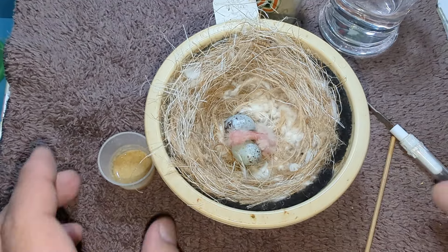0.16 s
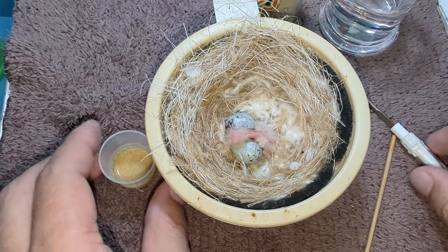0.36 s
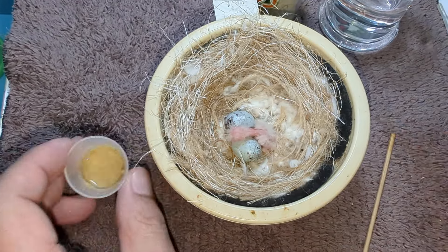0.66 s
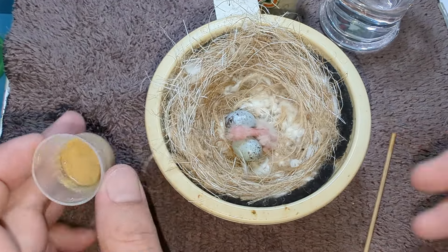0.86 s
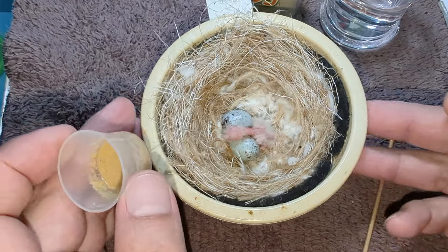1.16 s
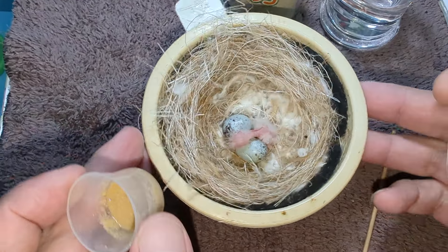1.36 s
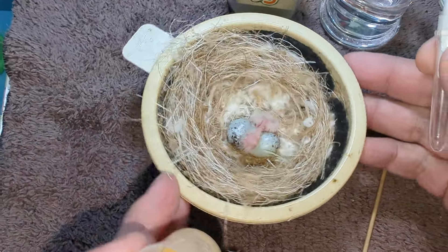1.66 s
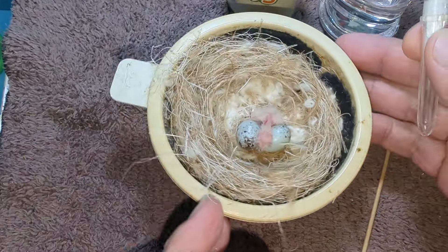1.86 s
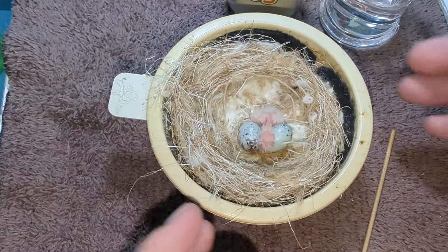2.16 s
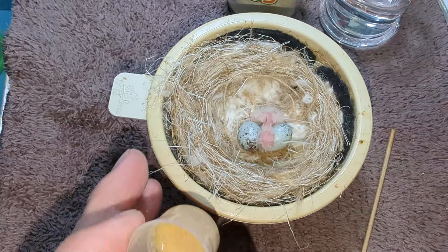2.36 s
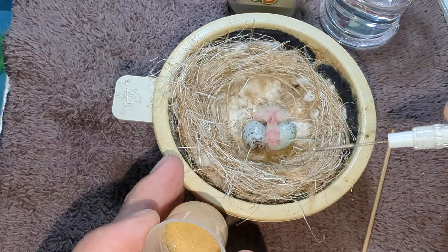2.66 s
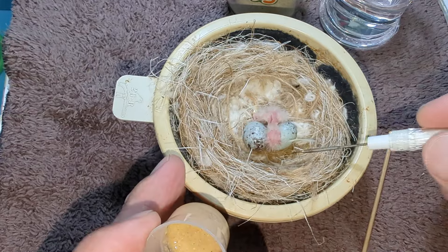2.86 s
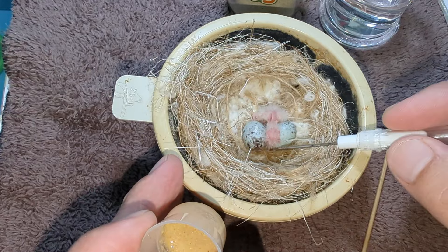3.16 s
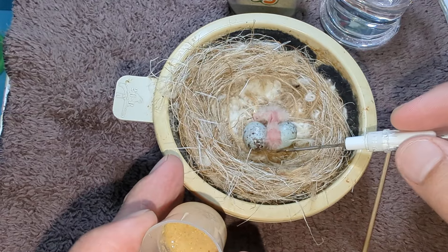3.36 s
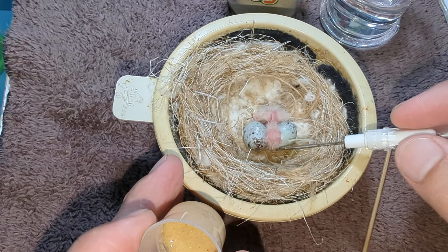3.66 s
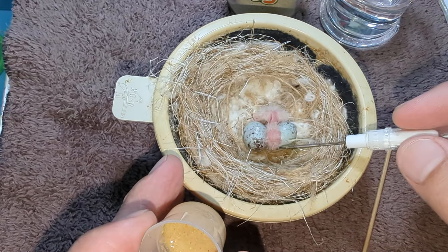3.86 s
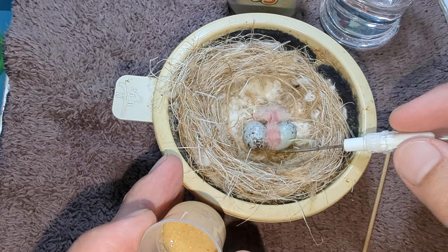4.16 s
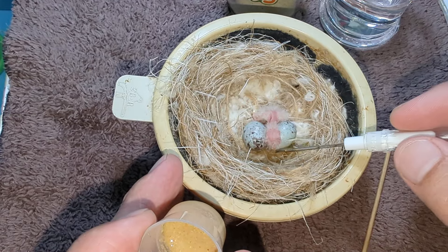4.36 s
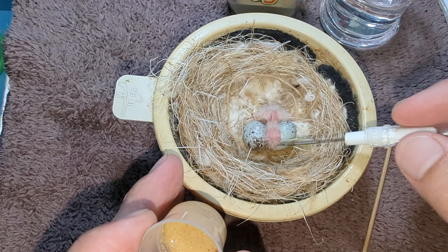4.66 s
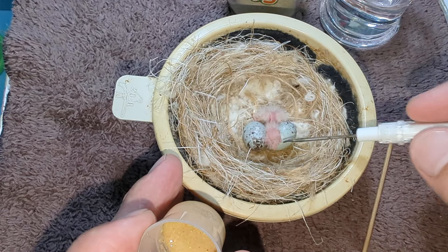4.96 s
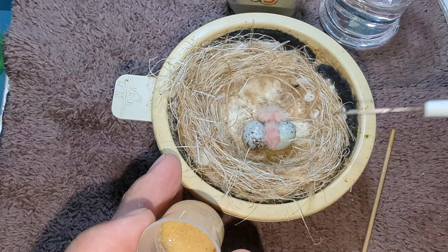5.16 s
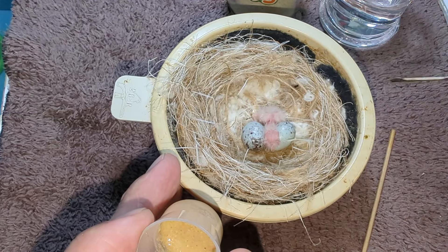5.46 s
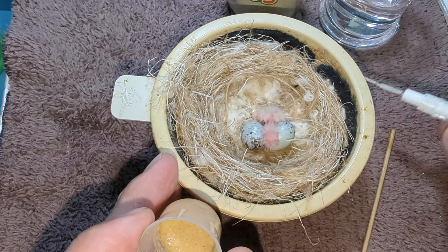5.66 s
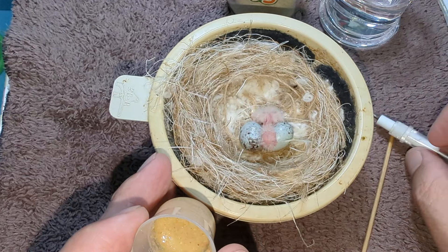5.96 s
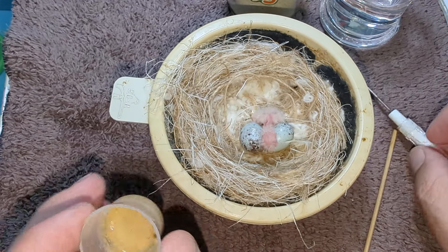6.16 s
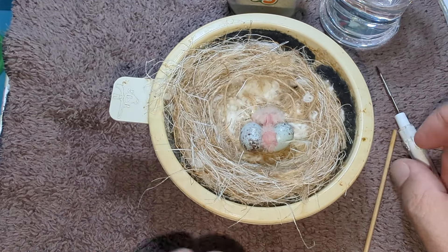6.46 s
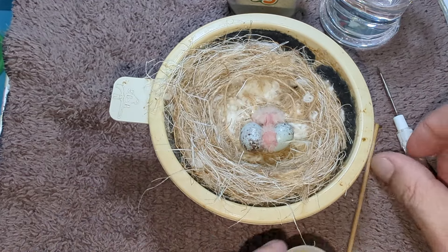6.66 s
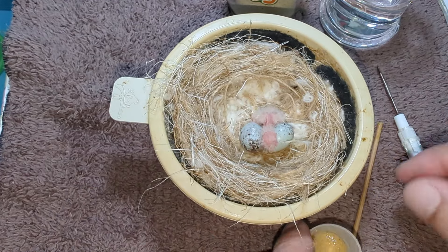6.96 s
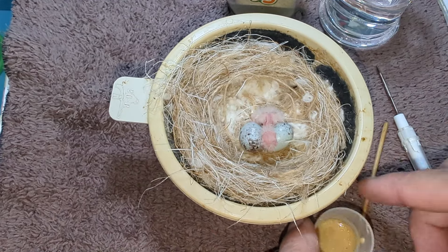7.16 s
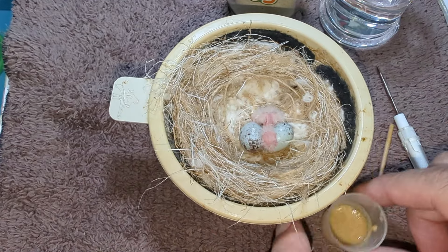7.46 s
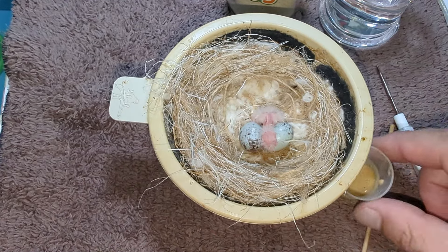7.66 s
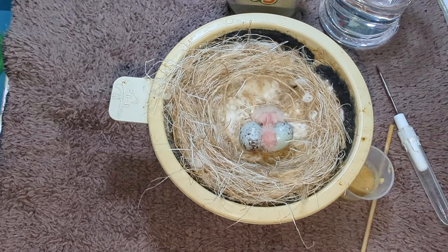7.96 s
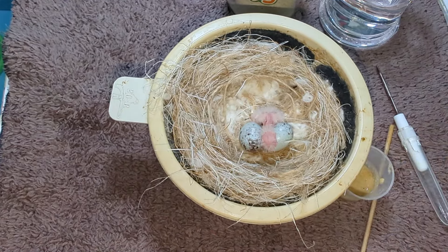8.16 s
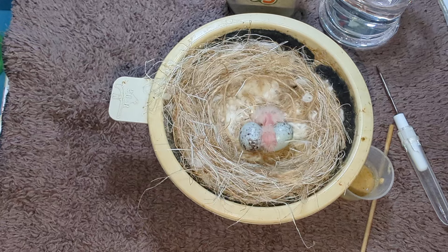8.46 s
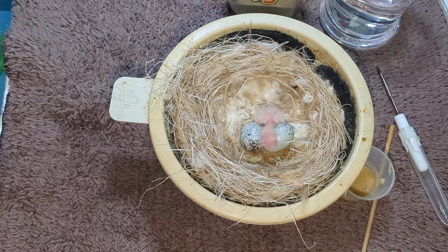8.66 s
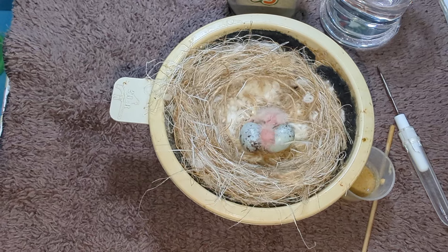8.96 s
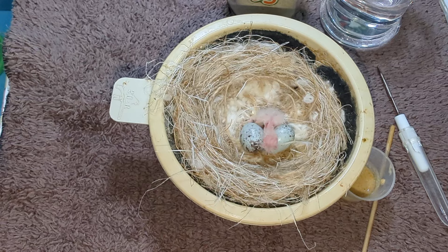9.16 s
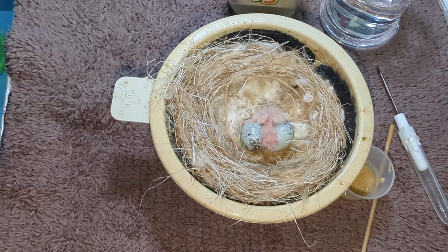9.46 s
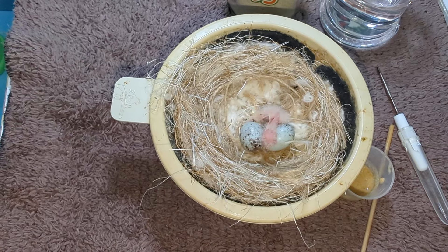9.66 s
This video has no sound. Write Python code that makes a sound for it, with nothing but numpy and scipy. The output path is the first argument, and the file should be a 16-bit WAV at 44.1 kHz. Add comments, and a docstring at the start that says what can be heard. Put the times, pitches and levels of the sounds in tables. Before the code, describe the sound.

In a small quiet room with low hum and steady air noise, a newly hatched chick gives thin, high, arching peeps amid dry rustling. The nest bowl knocks once, then someone makes a quick run of loud, wet lip kisses with a squeaky suck of air. The chick answers with a rapid string of peeps, then slows to isolated ones while other birds whistle faintly. Close stereo microphone.

```python
"""A low room hum and steady air noise run throughout, with a dry treble rustle, soft rubs and long dull swells of noise.
From 0.3 s a canary chick peeps thinly in its straw nest: near sines that arch up in pitch and droop.
The nest bowl gives one dry knock at 1.4 s. From 2.9 to 4.3 s someone coaxes the chick with a quick run of
lip kisses, built from filtered pulses with wet spray, over an unsteady squeak of sucked air.
From 4.5 s other birds whistle faintly further off, as gliding sines heard mostly by way of the small room."""
import sys
import numpy as np
from scipy import signal
from scipy.fft import rfft, irfft
from scipy.io import wavfile

SR = 44100
rng = np.random.default_rng(int(sys.argv[2]) if len(sys.argv) > 2 else 0)


def master(y):
    """Save y as 16-bit WAV."""
    cut = np.clip(np.atleast_2d(y).T, -1, 1)
    pcm = np.round(cut * 32767)  # scale
    wavfile.write(sys.argv[1], SR, pcm.astype(np.int16))


N = 432621
TIME = np.arange(N) / SR  # s

# Decay of the small room. Each row: frequency in Hz, time to fall by 60 dB in seconds.
ROOM_DECAY = [(150, 0.28), (700, 0.26), (2800, 0.23), (5500, 0.28), (9000, 0.25), (15000, 0.15)]
# Spectrum of the air noise. Each row: frequency in Hz, relative density in dB per Hz.
AIR_SPECTRUM = [(22, -49), (38, 5), (107, -3), (207, -13.5), (389, -14.5), (488, -14.5), (613, -11.5),
                (662, -13), (1040, -13.5), (2730, -18), (5670, -29), (8720, -27.5), (10200, -42),
                (14500, -44), (16000, -59)]
# How alike the air noise is at the two ports. Each row: frequency in Hz, left-right likeness from 0 to 1.
AIR_LIKENESS = [(30, .97), (60, .92), (130, .9), (290, .82), (640, .15), (1400, .1), (16000, .2)]
# Lines of the appliance hum. Each row: frequency in Hz, rms level in dB.
HUM_LINES = [(70, -61), (106, -64.5), (119, -64), (175, -70), (241, -71.5), (619, -73.5), (738, -75.5)]
# Soft rubs and long dull swells of noise.
# Each row: start in seconds, length in seconds, centre frequency in Hz, level in dB.
RUBS_AND_SWELLS = [(0, 2.52, 257, -66.5), (0.49, .11, 1310, -56.5), (1.827, 0.11, 2330, -58.5),
                   (2.935, .085, 360, -51), (2.97, .11, 177, -52), (4.001, 2.36, 60.6, -59),
                   (4.001, 2.56, 245, -65), (5.982, 0.0523, 1600, -52), (6.325, .27, 2596, -58.5),
                   (6.416, 0.053, 490, -55.5), (8.202, 1.95, 950, -65.5)]
# How strong the dry treble rustle is. Each row: time in seconds, relative level in dB.
RUSTLE_LEVEL = [(0, -76.5), (.6, -69), (1.3, -73), (1.9, -68), (2.55, -75), (3.1, -63.5), (4, -71),
                (4.65, -67.5), (5.95, -67.5), (6.25, -72), (7.1, -88.5), (7.5, -68.5), (8.1, -77.5),
                (8.3, -69), (8.5, -81), (9.8, -83)]
# Colour of the dry rustle. Each row: frequency in Hz, relative gain in dB.
RUSTLE_COLOUR = [(1500, -2), (3000, -6.5), (6000, 0.5), (8800, 6), (10000, -5), (13000, 1), (16000, -14)]
# Single straw stalks crackling. Each row: start in seconds, level in dB.
CRACKLES = [(1.409, -51), (2.728, -49.5), (5.407, -54), (5.574, -42), (5.59, -64), (5.621, -53),
            (5.714, -52), (9.471, -55)]
# The chick's peeps. Each row: time of the arch's top in seconds, top pitch in Hz, level ahead of the throat in dB.
PEEPS = [(.291, 5050, -55.5), (1.038, 5390, -54), (1.228, 5390, -53.5), (1.582, 5410, -54.5),
         (1.657, 6900, -59.5), (1.709, 5550, -54), (1.838, 5300, -55.5), (1.898, 7010, -55.5),
         (1.953, 5340, -55.5), (2.094, 5300, -57.5), (2.248, 5160, -55.5), (2.634, 6490, -58.5),
         (3.384, 5400, -50), (3.577, 5100, -48), (4.14, 5390, -52), (4.364, 5850, -49),
         (4.653, 5530, -49.5), (4.809, 5450, -51), (4.936, 5400, -50), (5.057, 5146, -50.5),
         (5.172, 5050, -49.5), (5.308, 5100, -50.5), (5.422, 4940, -50.5), (5.54, 5130, -51),
         (5.674, 5310, -52.5), (5.814, 5060, -51.5), (5.819, 6550, -46.5), (5.952, 5030, -51),
         (5.958, 6920, -43), (6.67, 5080, -49), (7.527, 4584, -51), (8.263, 4760, -52.5),
         (9.139, 5060, -53.5), (9.257, 4990, -53.5), (9.559, 5300, -50.5)]
# Resonance of the chick's throat. Each row: frequency in Hz, gain in dB.
THROAT = [(3400, 7), (4100, 1), (4450, 4), (5600, -2), (7000, 2), (9300, 5), (11500, -1)]
# The nest bowl when knocked. Each row: frequency in Hz, relative gain in dB.
BOWL_COLOUR = [(120, -39), (200, -17), (2540, -1), (3890, -26), (6400, -12), (10200, -33), (14000, -39)]
# The lip kisses. Each row: time of the pop in seconds, ring pitch in Hz, body level in dB, hollow bass lift in dB,
# ring level in dB, spray level in dB, lead of the first slip in seconds,
# ring and spray offset of the slips in dB, on top of their growth towards the pop.
KISSES = [(2.8858, 2630, -31.5, -10, -53, -27, 0.01, 3.5), (3.08, 2960, -24.5, 6, -26.5, -27.5, 0.022, 0),
          (3.284, 2770, -27, -4, -21, -33, .015, -0.5), (3.485, 2670, -28.5, 9, -19.5, -30, .021, -5.5),
          (3.68, 2980, -30.5, -3, -32.5, -37.5, 0.00033, -8),
          (3.884, 2620, -26, -0.5, -22.5, -25.5, .027, -10.5),
          (4.1078, 3170, -32.5, 0.5, -24, -34.5, 0, -1.5), (4.32, 2930, -20.5, 0, -20, -20.5, 0.031, -15)]
# Body of a lip snap. Each row: frequency in Hz, relative gain in dB.
SNAP_BODY = [(90, -37), (170, -21), (240, 6.5), (400, -4), (660, -4.5), (900, 6), (1600, 1.5), (2200, 2.5),
             (2900, 5), (4500, -24.5)]
# Wet spray of a lip snap. Each row: frequency in Hz, relative gain in dB.
SNAP_SPRAY = [(1500, -60), (3000, -6.5), (4200, 0), (5200, -12), (6500, -4), (7600, -7), (8900, 1),
              (10000, -5.5), (10900, 7.5), (12000, 0.5), (16000, -20)]
# The left port against the right, for the kisses. Each row: frequency in Hz, gain in dB.
LEFT_SHADE = [(1000, -2.5), (2800, 2), (7500, -0.5), (9000, 7), (11000, -11.5), (15000, 3)]
# Air squeaking through pursed lips. Each row: time in seconds, pitch in Hz, level in dB.
SQUEAK = [(2.997, 2650, -40.5), (3.035, 2587, -45), (3.084, 2980, -37.5), (3.116, 2526, -43),
          (3.169, 2440, -52), (3.21, 2967, -47.5), (3.28, 2807, -51), (3.345, 2605, -45), (3.41, 2665, -66),
          (3.52, 2580, -55)]
# Faint whistles of other birds.
# Each row: start in seconds, length in seconds, first pitch in Hz, last pitch in Hz, level in dB.
WHISTLES = [(4.535, .16, 3004, 2340, -58), (4.583, 0.055, 4380, 4080, -55), (4.598, 0.055, 3570, 3340, -60),
            (5.188, 0.038, 3250, 3270, -56), (6.79, 0.094, 5130, 4110, -64.5),
            (6.937, 0.08, 5230, 4100, -61), (7.108, 0.056, 5100, 4100, -67), (7.824, .08, 6550, 6150, -63),
            (7.971, 0.064, 4800, 5200, -58), (7.98, 0.12, 2400, 2730, -63), (9.051, 0.71, 1730, 1557, -64)]


def amp(db):
    """Decibels to gain."""
    return 10 ** (np.asarray(db) / 20)


def unit(x):
    """Scales to rms 1."""
    return x / np.sqrt(np.mean(x ** 2) + 1e-20)


def read(points, hz):
    """Reads a table of frequencies and values on a log-frequency axis."""
    f, value = np.transpose(points)
    return np.interp(np.log(hz + 1), np.log(f + 1), value)


def add(mix, s, sound):
    """Adds a sound into the mix at time s."""
    part = mix[max(round(s * SR), 0):][:len(sound)]
    part += sound[:len(part)]


def colour(x, points):
    """Filters a full-length signal by a table of gains."""
    return irfft(rfft(x) * amp(read(points, np.fft.rfftfreq(N, 1 / SR))), N)


def click(points, size=1024):
    """The shortest causal impulse (minimum phase) with the spectrum of a table."""
    log_gain = np.log(amp(read(points, abs(np.fft.fftfreq(size, 1 / SR)))))
    return np.fft.ifft(np.exp(signal.hilbert(log_gain).conj())).real[:size // 2]


def wander(size, hz):
    """Smooth random drift of rms 1, its speed rolled off around hz."""
    f = np.fft.rfftfreq(size, 1 / SR)
    return unit(irfft(rfft(rng.standard_normal(size)) * np.exp(-(f / hz) ** 2), size))


def delay(spectrum, lag_ms):
    """Shifts a full-length spectrum later by lag_ms."""
    f = np.fft.rfftfreq(N, 1 / SR)
    return spectrum * np.exp(-2j * np.pi * f * lag_ms / 1000)


def place(x, lag_ms, wet_db):
    """Direct sound reaches the left port lag_ms late; the room adds sparse taps that die band by band."""
    direct = np.array([irfft(delay(rfft(x), lag_ms), N), x])
    size = SR // 2
    taps = rng.standard_normal((2, size))
    taps *= rng.random((2, size)) < .15
    taps *= TIME[:size] > .003  # a short gap ahead of the first reflection
    hz, t, bands = signal.stft(taps, SR, nperseg=256)
    decay = amp(-60 * t / read(ROOM_DECAY, hz)[:, None])
    tail = signal.istft(bands * decay, SR, nperseg=256)[1]
    tail /= np.linalg.norm(tail, axis=1, keepdims=True)
    return direct + amp(wet_db) * signal.fftconvolve(x[None], tail, axes=1)[:, :N]


def room_tone(air_db=-52.5, waver=0.73, lag_ms=-0.287):
    """Steady air noise from the left, alike at both ports in the bass, and a hum whose low lines waver most."""
    shared, separate = rfft(rng.standard_normal((2, N)))
    alike = np.clip(read(AIR_LIKENESS, np.fft.rfftfreq(N, 1 / SR)), -1, 1)
    left = delay(shared, lag_ms)
    right = alike * shared + np.sqrt(1 - alike ** 2) * separate
    air = colour(irfft(np.array([left, right]), N), AIR_SPECTRUM)
    hum = np.zeros(N)
    for hz, db in HUM_LINES:
        phase = 2 * np.pi * hz * TIME + waver * 100 / hz * wander(N, 10.2)
        hum += amp(db) * np.sqrt(2) * np.sin(phase)
    return amp(air_db) * unit(air) + hum


def rubs_and_swells(width=0.29):
    """Soft rubs and long dull swells of noise, each in one broad band; width is a share of its centre frequency."""
    out = np.zeros(N)
    for s, length, hz, db in RUBS_AND_SWELLS:
        size = int(length * SR)
        band = np.exp(-((np.fft.rfftfreq(size, 1 / SR) - hz) / (width * hz)) ** 2)
        noise = unit(irfft(rfft(rng.standard_normal(size)) * band, size))
        add(out, s, amp(db) * np.hanning(size) * noise)
    return place(out, lag_ms=-0.1, wet_db=-1)


def dry_rustle(lift_db=4.5, grains_per_s=4000, spread_db=3.0, crackle_s=0.0048):
    """Countless tiny grains of dry rustle follow the level curve, which also lifts around some peeps; stalks crackle."""
    grains = rng.standard_normal(N) * (rng.random(N) < grains_per_s / SR)
    grains *= amp(spread_db * np.minimum(rng.exponential(1, N), 5))  # a few grains stand out
    level = amp(lift_db + np.interp(TIME, *np.transpose(RUSTLE_LEVEL)))
    for s, db in CRACKLES:
        add(level, s, amp(db) * np.exp(-TIME[:SR // 10] / crackle_s))
    return place(unit(colour(grains, RUSTLE_COLOUR)) * level, lag_ms=-0.198, wet_db=-1.0)


def peep(hz, fall_s, octave_db, slack_hz=4190, fall_share=.2, rise_s=0.024, jitter=0.007,
         loudest_at=0.13, spread=0.95, octave_at=0.63, octave_spread=0.61):
    """A near sine arches from the slack pitch to its top, then drops by fall_share in fall_s; gives lead and sound."""
    t = np.arange(-1.4 * rise_s, 1.3 * fall_s, 1 / SR)
    arch = t / np.where(t < 0, rise_s, fall_s)  # -1 at the slack pitch, 0 at the top, 1 after the fall time
    end_ratio = np.where(t < 0, slack_hz / hz, 1 - fall_share)
    pitch = hz * end_ratio ** (arch ** 2) * (1 + jitter * wander(len(t), 380))
    phase = 2 * np.pi * np.cumsum(pitch) / SR
    tone = np.exp(-((arch - loudest_at) / spread) ** 2) * np.sin(phase)
    octave = np.exp(-((arch - octave_at) / octave_spread) ** 2) * np.sin(2 * phase)  # strongest on the way down
    return -t[0], (tone + amp(octave_db) * octave) * signal.windows.tukey(len(t), .2)


def chick(run_s=.22, left_db=2.5):
    """Peeps closer than run_s make the chick eager: each falls more slowly, with a stronger octave."""
    out, times = np.zeros(N), np.transpose(PEEPS)[0]
    for s, hz, db in PEEPS:
        neighbours = np.exp(-((times - s) / run_s) ** 2).sum() - 1
        eager = 1 - np.exp(-neighbours)
        lead, sound = peep(hz, fall_s=0.016 + eager * 0.0088, octave_db=-16 + eager * 4)
        add(out, s - lead, amp(db) * sound)
    balance = amp([[left_db / 2], [-left_db / 2]])
    return place(colour(out, THROAT), lag_ms=-0.28, wet_db=3.5) * balance


def bowl_tap(tap_s=1.4036, peak_db=-34):
    """One dry knock as the hand turns the nest bowl: a single impulse through the bowl's colour."""
    out, knock = np.zeros(N), click(BOWL_COLOUR)
    add(out, tap_s, amp(peak_db) * knock / abs(knock).max())
    return place(out, lag_ms=0, wet_db=-6)


def slips(count=2, shrink=0.37, growth_db_per_s=297, sealed_db=-12.5):
    """Sucked lips slip, slip again sooner and harder, then pop open; while sealed they mute the body."""
    for s, hz, body_db, hollow_db, ring_db, spray_db, lead, slip_db in KISSES:
        for early in lead * shrink ** np.arange(count * (lead > 0)):
            db = -growth_db_per_s * early
            yield (s - early, hz, body_db + db + sealed_db, hollow_db,
                   ring_db + db + slip_db, spray_db + db + slip_db)
        yield s, hz, body_db, hollow_db, ring_db, spray_db


def lip_kisses(ring_s=0.0014, body_s=0.0046, spray_s=0.0054, scatter=0.24, spray_scatter=0.2, ring_scatter=0.099,
               suck_s=0.011, suck=0.037, wet_suck_s=0.0038, wet_suck=0.021,
               hollow_hz=950, brighten=0.62, firm_db=-27):
    """Suction hisses up to each slip: a pulse with close echoes in a hollow body, the lip opening and a wet spray."""
    out, slip = np.zeros(N), SR // 20
    t = TIME[:SR // 10] - TIME[slip]  # the slip falls at 0
    head = slice(slip, slip + SR // 250)  # levels hold for the first 4 ms
    hiss = suck * np.exp(-abs(t) / suck_s)
    wet_hiss = wet_suck * np.exp(-abs(t) / wet_suck_s)
    body_fade, spray_fade = np.exp(-abs(t) / body_s), np.exp(-abs(t) / spray_s)
    for s, hz, body_db, hollow_db, ring_db, spray_db in slips():
        # the mouth's hollow shifts the body below hollow_hz
        body = click([(f, db + hollow_db * np.clip(np.log2(hollow_hz / f) / 2, 0, 1)) for f, db in SNAP_BODY])
        ring = np.exp(-TIME[:512] / ring_s) * np.sin(2 * np.pi * hz * TIME[:512])
        tilt_db = brighten * (body_db - firm_db)  # dB per octave above 8 kHz: firm pops are brighter
        spray = click([(f, db + tilt_db * max(np.log2(f / 8000), 0)) for f, db in SNAP_SPRAY])
        layers = ((body, body_db, hiss, scatter * body_fade),
                  (ring, ring_db, hiss, ring_scatter * body_fade),
                  (spray, spray_db, wet_hiss, spray_scatter * spray_fade))
        for shape, db, before, after in layers:
            noise = np.where(t < 0, before, after) * rng.standard_normal(len(t))
            part = signal.fftconvolve((t == 0) + noise, shape)
            add(out, s + t[0], amp(db) * part / np.std(part[head]))
    left, right = place(out, lag_ms=0.14, wet_db=-15)
    return np.array([colour(left, LEFT_SHADE), right])


def squeak(flutter_db=4, second_db=-3, third_db=-16):
    """The lips buzz as air is sucked between them: an unsteady tone with two raspy overtones."""
    s, hz, db = np.transpose(SQUEAK)
    t = np.arange(s[0], s[-1], 1 / SR)
    pitch = np.interp(t, s, hz) * (1 + .02 * wander(len(t), 600))
    phase = 2 * np.pi * np.cumsum(pitch) / SR
    rasp = .6 * wander(len(t), 600)  # phase roughness in radians
    tone = np.sin(phase)
    tone += amp(second_db) * np.sin(2 * phase + rasp)
    tone += amp(third_db) * np.sin(3 * phase + 2 * rasp)
    level = amp(np.interp(t, s, db) + flutter_db * wander(len(t), 170))
    out = np.zeros(N)
    add(out, s[0], tone * signal.windows.tukey(len(t), .02) * level)
    return place(out, lag_ms=0.11, wet_db=-2.5)


def other_birds(jitter=0.011):
    """Thin gliding whistles, heard mostly by way of the room."""
    out = np.zeros(N)
    for s, length, first_hz, last_hz, db in WHISTLES:
        size = int(length * SR)
        pitch = np.linspace(first_hz, last_hz, size) * (1 + jitter * wander(size, 150))
        whistle = np.sin(2 * np.pi * np.cumsum(pitch) / SR)
        add(out, s, amp(db) * np.hanning(size) * whistle)
    return place(out, lag_ms=-0.27, wet_db=5.0)


def scene():
    """All sources at the two microphone ports."""
    background = room_tone() + rubs_and_swells() + dry_rustle()
    return background + chick() + bowl_tap() + lip_kisses() + squeak() + other_birds()


def record(dry, bass_cut_hz=42, edge_hz=15900):
    """The recorder's bass cut and band limit."""
    cut = signal.sosfilt(signal.butter(6, bass_cut_hz, "highpass", fs=SR, output="sos"), dry)
    band_limit = signal.firwin(511, edge_hz, window=("kaiser", 9), fs=SR)
    return signal.oaconvolve(cut, band_limit[None], "same")


dry = scene()
out = record(dry)
master(out)
```